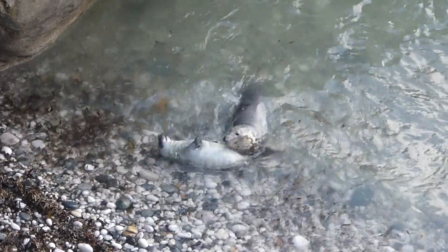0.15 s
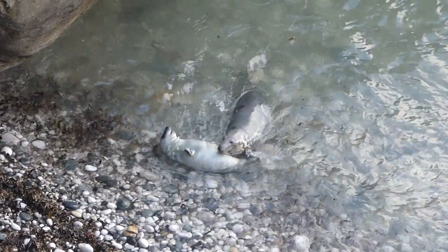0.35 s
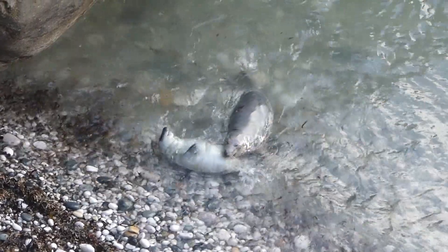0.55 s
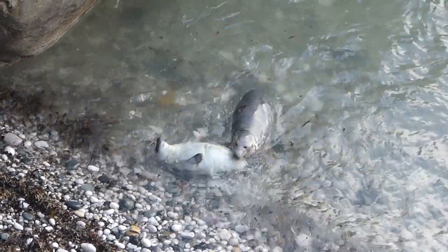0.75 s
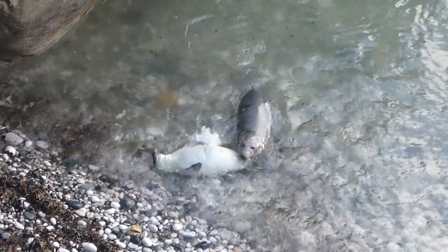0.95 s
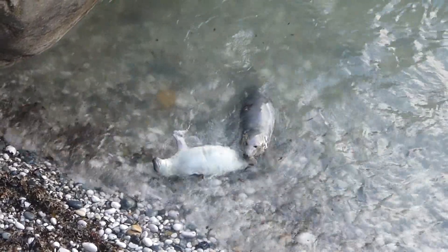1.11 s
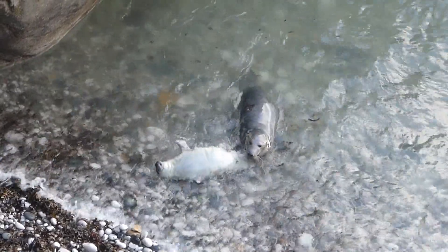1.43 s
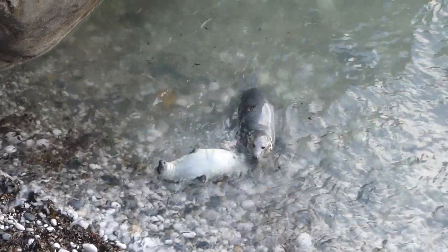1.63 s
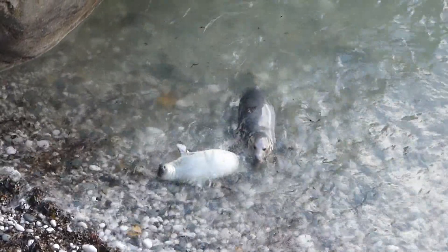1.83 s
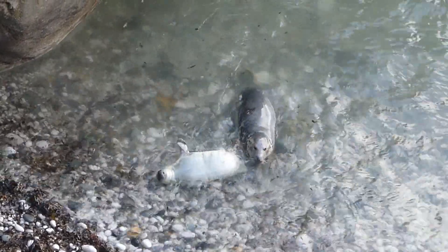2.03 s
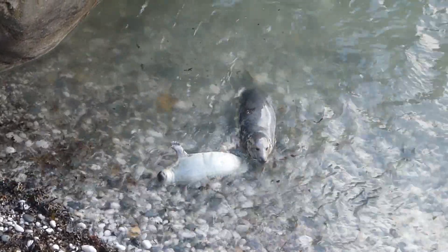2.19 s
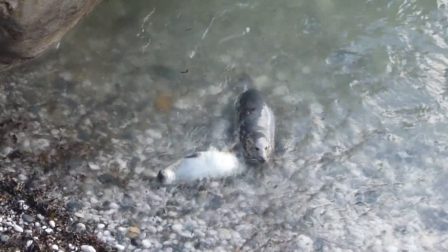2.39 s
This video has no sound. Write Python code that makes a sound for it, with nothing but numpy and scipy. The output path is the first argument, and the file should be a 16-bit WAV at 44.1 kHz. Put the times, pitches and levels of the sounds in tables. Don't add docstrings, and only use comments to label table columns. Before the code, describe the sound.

Shallow seawater surges and fizzes among pebbles outdoors, swelling toward the middle and easing afterward. Low wind buffeting covers it in the first half second, heavier on the right, and returns briefly late; no animal calls.

```python
import sys
import numpy as np
from scipy import signal
from scipy.fft import rfft, irfft
from scipy.io import wavfile
from scipy.ndimage import uniform_filter1d

SR = 44100
rng = np.random.default_rng(int(sys.argv[2]) if len(sys.argv) > 2 else 0)


def to_wav(sig):
    pcm = np.clip(np.atleast_2d(sig), -1, 1) * 32767
    pcm = np.round(pcm).astype(np.int16)
    wavfile.write(sys.argv[1], SR, pcm.T)


def volts_from_decibels(level):
    exponent = np.asarray(level, float) / 20
    return 10 ** exponent


N = 112454


def evened(x):
    return x / np.sqrt(np.mean(x ** 2) + 1e-20)


def read(points, hz):
    f, value = np.transpose(points)
    return np.interp(np.log(hz + 1), np.log(f + 1), value)


def shaped(noise, spectrum):
    gain = volts_from_decibels(read(spectrum, np.fft.rfftfreq(N, 1 / SR)))
    return evened(irfft(rfft(noise) * gain, N))


def curve(table, column=1):
    rows = np.array(table)
    return np.interp(np.arange(N) / SR, rows[:, 0], rows[:, column])


def add(mix, s, sound):
    part = mix[..., max(round(s * SR), 0):][..., :sound.shape[-1]]
    part += sound[..., :part.shape[-1]]


def sides(pan_db):
    return volts_from_decibels(np.array([pan_db / 2, -pan_db / 2]))


# frequency in Hz, left-right correlation (0 to 1).
PORT_LIKENESS = [(60, 0.74), (130, 1), (290, 1), (640, 0.93), (1410, 0.67), (3100, 0.9), (6820, 0.91),
                 (15000, 0.76)]
# frequency in Hz, left-right difference in dB.
PORT_LEAN = [(60, -2), (180, 0), (550, -1), (1650, -2.5), (4970, -1.0), (15000, -1.5)]
# frequency in Hz, left lead in radians.
PORT_LEAD = [(0, 0), (1810, 0), (3960, 0.57), (4310, 0), (7320, 0.03), (15200, 0.15)]


def water(spectrum, patchy_db, flicker_db):
    frames, hz = N // 128 + 5, np.fft.rfftfreq(512, 1 / SR)
    a, b, c, d, patches, flicker = rng.standard_normal((frames, 257, 6)).T
    patches = uniform_filter1d(patches, size=7, axis=0)
    patches = evened(uniform_filter1d(patches, size=24, axis=1))
    flicker = uniform_filter1d(flicker, size=90, axis=0)
    flicker = evened(uniform_filter1d(flicker, size=3, axis=1))

    likeness = np.clip(read(PORT_LIKENESS, hz), -1, 1)[:, None]
    left = a + 1j * b
    right = likeness * left + np.sqrt(1 - likeness ** 2) * (c + 1j * d)
    right = right * np.exp(-1j * read(PORT_LEAD, hz))[:, None]
    z = np.array([left, right]) * sides(read(PORT_LEAN, hz))[..., None]
    z = z * volts_from_decibels(patchy_db * patches + flicker_db * flicker)
    noise = signal.istft(z, nperseg=512, noverlap=384)[1][:, :N]
    return shaped(noise, spectrum)


def grains(per_s, low_hz, high_hz, cycles, spread_db):
    size = volts_from_decibels(spread_db * np.minimum(rng.exponential(1, N), 5))
    size = size * (rng.random(N) < per_s / SR)
    kind, out = rng.integers(0, 24, N), np.zeros((2, N))
    for k, hz in enumerate(np.geomspace(low_hz, high_hz, num=24)):
        u = np.arange(int(3.6 * cycles * SR / hz)) * hz / SR
        blip = np.sin(2 * np.pi * u * (1 + 0.011 * u)) * np.minimum(u, 1) * np.exp(-2 * u / cycles)
        blip = blip * np.sqrt(low_hz / hz)
        pan = sides(4 * rng.uniform(-0.63, 1) - 1.5)[:, None]
        out += pan * signal.oaconvolve(size * (kind == k), blip)[:N]
    return evened(out)


# time in seconds, wash level in dB, extra spray in dB, extra surge in dB.
SWELL = [(0, -48.5, 0, 3), (.3, -46, -1, -1), (.68, -44, -1.5, 0.5), (.8, -43, 2.5, -0.5), (.93, -40, 1, 0),
         (1.15, -43, -0.5, 1.5), (1.5, -38.5, -1, -2.5), (1.75, -41.5, -0.5, 0), (1.85, -43.5, 2, 0.5),
         (1.97, -43.5, 2, 1), (2.12, -45, -1, 2), (2.55, -45, -0.5, 1.5)]
# frequency in Hz, density in dB per Hz.
SURGE_SPECTRUM = [(18, -69), (30, -15), (102, -18.5), (189, -5), (329, -1), (457, -0.5), (1270, -8.5),
                  (2400, -12), (4000, -25), (5200, -34), (8800, -120)]
# frequency in Hz, density in dB per Hz.
FOAM_SPECTRUM = [(800, -21), (2500, -3), (3500, -5), (4200, -10.5), (6000, -12.5), (7800, -22.5),
                 (15600, -45)]
# frequency in Hz, density in dB per Hz.
SPRAY_SPECTRUM = [(3500, -12), (5500, -1.5), (7800, -7.5), (9900, -4), (12000, -12.5), (15600, -23)]


def surf():
    swell_db = curve(SWELL) + 42.5
    surge = volts_from_decibels(-39) * water(SURGE_SPECTRUM, patchy_db=0.5, flicker_db=0.08)
    bubbles = volts_from_decibels(-52) * grains(400, 357.4, 1695, cycles=10.5, spread_db=3.7)
    foam = volts_from_decibels(-45.5) * water(FOAM_SPECTRUM, patchy_db=0.4, flicker_db=0.34)
    rattle = volts_from_decibels(-52) * grains(1400, 1888, 9900, cycles=4.9, spread_db=3.8)
    spray_gain = volts_from_decibels(-54.5 + curve(SWELL, column=2))
    spray = spray_gain * water(SPRAY_SPECTRUM, patchy_db=2.0, flicker_db=0.6)

    body = (surge + bubbles) * volts_from_decibels(0.87 * swell_db + curve(SWELL, column=3))
    fizz = (foam + rattle + spray) * volts_from_decibels(0.8 * swell_db)
    return body + fizz


# start in seconds, level in dB, ring in Hz.
STONE_KNOCKS = [(.079, -58, 6280), (.109, -51, 4600), (.712, -54, 5840), (.9055, -49, 5720),
                (1.026, -46, 4670), (1.451, -44, 5340), (1.521, -47, 4900), (1.55, -49, 6500),
                (1.637, -53, 4700), (1.664, -51, 5850), (1.692, -44, 6130), (1.7508, -38.5, 6220),
                (2.104, -49, 5320)]


def stones():
    out, t = np.zeros((2, N)), np.arange(800) / SR
    band = signal.butter(3, [4500, 12500], "band", fs=SR, output="sos")
    for s, db, hz in STONE_KNOCKS:
        tick = 1.2 * signal.sosfilt(band, rng.standard_normal(800)) * np.exp(-t / 0.0063)
        ring = np.sin(2 * np.pi * hz * t) * np.exp(-((t - .0025) / 0.0021) ** 2)
        knock = volts_from_decibels(db) * (tick + ring) * np.minimum(t / 0.0023, 1)
        add(out, s, np.tile(knock, (2, 1)))
    return out


# start in seconds, level in dB, pitch in Hz.
BUBBLE_BURSTS = [(.852, -30, 694), (.901, -40, 760), (1.015, -29.5, 650), (1.178, -33, 615),
                 (1.25, -32.5, 860), (1.42, -34.5, 1980), (1.629, -40, 720), (1.785, -36, 940),
                 (1.993, -38, 760), (2.174, -37, 977), (2.336, -37, 704)]


def plops():
    decay_s, rise = 0.0087, 0.14
    out = np.zeros((2, N))
    u = np.arange(0, 5 * decay_s, 1 / SR) / decay_s
    for s, db, hz in BUBBLE_BURSTS:
        turn = 2 * np.pi * hz * decay_s * u * (1 + rise * (u - 2) / 2)
        ring = np.sin(turn) * np.minimum(5 * u, 1) * np.exp(-u)
        add(out, s, sides(-2.0)[:, None] * volts_from_decibels(db) * ring)
    return out


# peak time in seconds, peak level in dB, pitch in Hz.
LEFT_PORT_EDDIES = [(0.06, -30.5, 144), (0.1669, -27.5, 183), (0.1968, -17.5, 176), (0.2221, -16.5, 206),
                    (0.2343, -28, 230), (0.2416, -13, 197), (0.2589, -15.5, 219), (0.2778, -13.5, 194),
                    (0.2981, -14.5, 342), (0.3128, -21, 216), (0.3323, -20, 215), (0.3441, -17, 207),
                    (0.3635, -12, 189), (0.3792, -11, 175), (0.3904, -16, 202), (0.4077, -10, 240),
                    (0.43, -13, 186), (0.4563, -7.5, 180), (0.4739, -10.5, 174), (0.483, -26, 197),
                    (0.4946, -14, 197), (0.5144, -14, 162), (0.5215, -20.5, 181), (0.5344, -12.5, 158),
                    (0.55, -17.5, 186), (0.5588, -23, 189), (0.5704, -15.0, 167), (0.5861, -17, 280),
                    (0.5999, -22, 172), (0.6268, -21, 169), (0.6508, -28, 156), (0.6661, -23, 207),
                    (0.6815, -26.5, 200), (0.6972, -20.5, 258), (0.7081, -24, 166), (0.7325, -30, 231),
                    (0.7407, -38, 192), (0.7696, -24, 214), (0.7809, -18, 173), (0.8258, -27.5, 193),
                    (0.8655, -25.5, 268), (0.9421, -29.5, 181), (0.9522, -26, 166), (2.1996, -22, 213),
                    (2.2111, -15, 250), (2.2202, -14, 282), (2.2323, -17, 197), (2.2482, -21, 200),
                    (2.2922, -41, 199)]
# peak time in seconds, peak level in dB, pitch in Hz.
RIGHT_PORT_EDDIES = [(0.1963, -41, 216), (0.2183, -10, 230), (0.2305, -38, 206), (0.254, -24, 257),
                     (0.2667, -3.5, 280), (0.2805, -20, 272), (0.2907, -17, 284), (0.2959, -4.5, 198),
                     (0.3068, -10, 316), (0.313, -11.5, 280), (0.3273, -6, 222), (0.3324, -16, 212),
                     (0.3434, -5, 214), (0.3589, -4, 213), (0.3701, -2, 215), (0.3852, -5.5, 256),
                     (0.4016, -7.5, 292), (0.4188, -14, 276.6), (0.4292, -2.5, 211), (0.4357, -5.5, 199),
                     (0.4513, -18, 215), (0.4632, -15, 259), (0.4746, -13.0, 169), (0.4832, -5.5, 220),
                     (0.4939, -13.0, 198), (0.5012, -16.5, 216), (0.5145, -31, 138), (0.527, -31, 165),
                     (0.5525, -13, 340), (0.5587, -16.5, 227), (0.5664, -34, 166), (0.581, -24, 165),
                     (0.589, -26.0, 146), (0.6167, -31, 227), (0.6338, -19, 215), (0.6447, -14.5, 190),
                     (0.6563, -16, 269), (0.6745, -14.5, 281), (0.6818, -20, 159), (0.6895, -23.5, 188),
                     (0.7078, -20, 236), (0.7268, -21, 220), (0.741, -23.5, 167), (0.761, -22, 290),
                     (0.7654, -21.5, 202), (0.78, -25.0, 169), (0.8596, -27, 216), (0.9687, -30, 166),
                     (0.9889, -33, 200), (2.1854, -33, 268), (2.2005, -25, 273), (2.2193, -17.5, 241),
                     (2.2262, -14, 197), (2.2407, -28.5, 242), (2.2547, -21.5, 212), (2.2736, -26, 187),
                     (2.2923, -15, 187), (2.3001, -23, 173), (2.3091, -29.5, 222)]


def eddies(table):
    swings, length_spread, ring_ratio = 1.7, 0.088, 0.82
    sway, phase_scatter, sharpen = .06, .4, .1
    out, t = np.zeros(N), np.arange(-.03, .06, 1 / SR)
    for (s, db, hz), (phase, drift, stretch) in zip(table, 2 * rng.random((len(table), 3)) - 1):
        length = swings / hz * (1 + length_spread * stretch)
        shape = np.exp(-2.8 * (t / (length * np.where(t > 0, ring_ratio, 1))) ** 2)
        turn = 2 * np.pi * hz * t * (1 + sway * drift * t / length) + phase_scatter * phase
        swing = np.cos(turn) + sharpen * shape ** 2 * np.cos(2 * turn)
        add(out, s - .03, volts_from_decibels(db) * shape * swing)
    return out


# time in seconds, level in dB, pitch in Hz, left-right in dB.
OVERLOAD_SNAPS = [
    (.2585, -20, 890, -7.5),
    (0.35, -22, 620, 0),
    (.3143, -16, 1030, -5),
    (0.308, -15, 416, -16.5),
    (.553, -27, 610, 13),
    (0.7, -25, 680, 20),
    (.368, -22, 660, -7),
    (.3165, -15.5, 490, -10.5),
    (1.7, -23, 470, 5),
    (2.7, -29, 430, -13),
]


def snaps():
    out, t = np.zeros((2, N)), np.arange(-.006, .006, 1 / SR)
    for s, db, hz, pan_db in OVERLOAD_SNAPS:
        shape = np.exp(-(2 * t * hz / 1.15) ** 2)
        swing = np.cos(2 * np.pi * hz * t + [[0], [2.3]])
        add(out, s - .006, sides(pan_db)[:, None] * volts_from_decibels(db) * shape * swing)
    return out


# time in seconds, strength in dB, left-right difference in dB.
GUSTS = [(0, -45, 19), (.06, -37.5, -20), (.12, -57, 23), (.21, -35, -30), (.46, -16.5, -8.5),
         (.59, -27.5, 15), (.62, -22, -3), (.78, -30, 3), (.81, -44, -13), (.94, -33.5, -2), (1.07, -38, 7),
         (1.22, -64, 8), (1.85, -82, 7), (2.17, -52, -9), (2.22, -25, -7), (2.30, -37, -3), (2.39, -70, -2),
         (2.49, -45.5, -5)]
# frequency in Hz, density in dB per Hz.
RUMBLE_SPECTRUM = [(25, -16), (55, -17.5), (115, -3), (160, -12.5), (260, -13.5), (450, -23), (900, -38),
                   (2000, -83)]


def wind():
    raw, lumps = rng.standard_normal((2, 2, N))
    lump_size = int(0.0072 * SR)
    lumps = evened(uniform_filter1d(uniform_filter1d(lumps, lump_size), lump_size))
    rumble = evened(shaped(raw, RUMBLE_SPECTRUM) * volts_from_decibels(2.5 * np.tanh(lumps)))
    out = rumble * volts_from_decibels(-6 + curve(GUSTS)) * sides(curve(GUSTS, column=2))
    out += np.array([eddies(LEFT_PORT_EDDIES), eddies(RIGHT_PORT_EDDIES)])
    out = out + 0.17 * uniform_filter1d(out[::-1], size=60)
    return out + snaps()


def scene():
    return surf() + stones() + plops() + wind()


def top_cut(x):
    return signal.sosfilt(signal.butter(12, 15610, fs=SR, output="sos"), x)


def record(dry):
    duck_from_db, duck_share, recover_db_per_s = -21.5, 0.25, 22.5
    cut = signal.sosfiltfilt(signal.butter(2, 80, "high", fs=SR, output="sos"), dry)
    power = uniform_filter1d((cut ** 2).mean(0), size=800)
    power_db = 10 * np.log10(abs(power) + 1e-12)
    fall = np.arange(N) * recover_db_per_s / SR
    held_db = np.maximum.accumulate(power_db + fall) - fall
    over_db = np.maximum(held_db - duck_from_db, 0)
    mix = cut / volts_from_decibels(duck_share * uniform_filter1d(over_db, size=400))
    return top_cut(mix)


dry = scene()
out = record(dry)
to_wav(out)
```